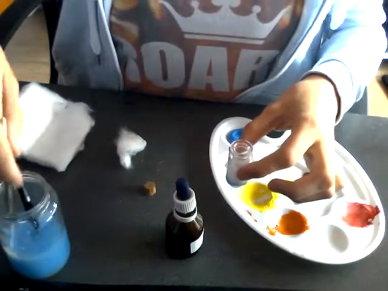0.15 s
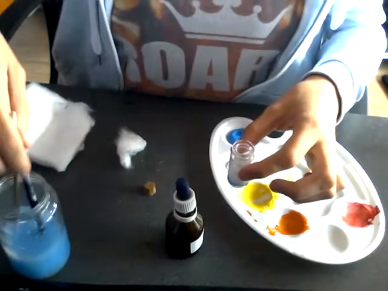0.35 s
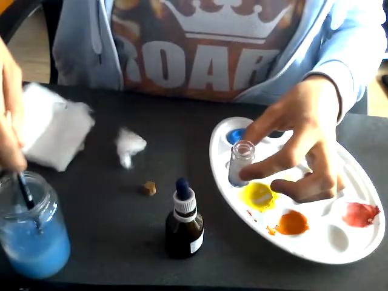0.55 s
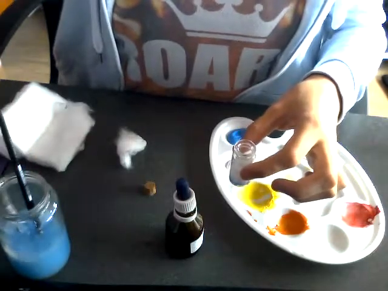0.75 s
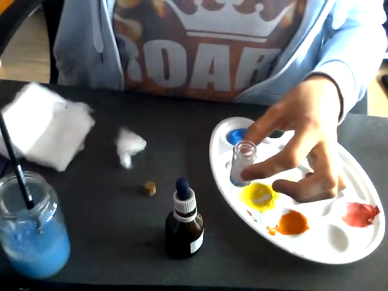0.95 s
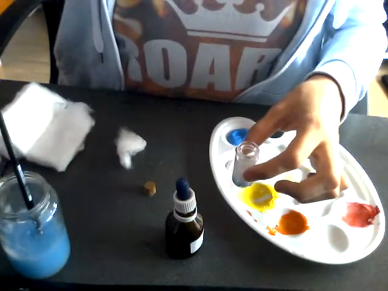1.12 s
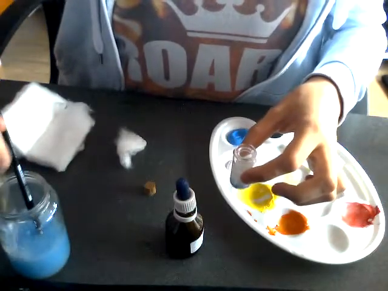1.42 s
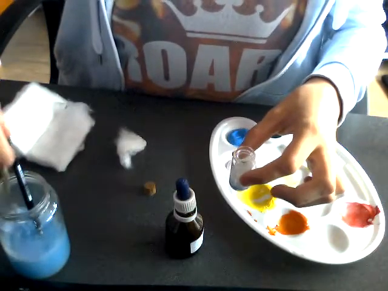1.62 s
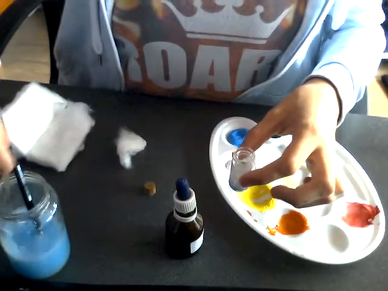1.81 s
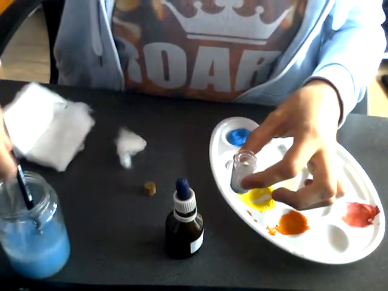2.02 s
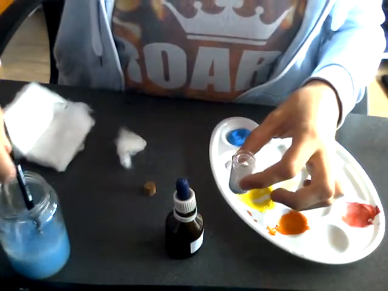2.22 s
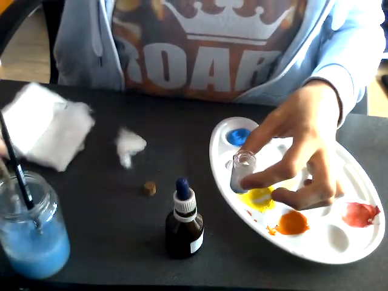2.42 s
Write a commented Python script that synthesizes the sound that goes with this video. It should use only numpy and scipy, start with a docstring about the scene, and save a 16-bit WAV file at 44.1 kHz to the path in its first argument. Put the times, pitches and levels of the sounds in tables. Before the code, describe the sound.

A brush clinks in a glass water jar, heard close in a small room. A loud bright tap at 0.23 s leads to a duller knock, tiny scrapes and plops until 0.5. Sparse taps follow at 0.86 and 0.96, faint jar rubbing around 1.2-1.5, a crisp clink at 1.53. From 1.7 water plops, drips and swirls; sharp clinks at 2.13 and 2.27. Low room noise and faint hum underneath.

```python
"""Brush stirred in a water jar

A brush handle clinks on the rim and wall of a glass jar, and drips hit: each is a noisy click plus fading sines.
The jar knocks and rubs on the table (low fading sines); the metal ferrule scrapes in runs of tiny clicks.
Water plops and fizzes as rising sines, and swirls as random pops through sliding resonances.
A small room adds noise echoes; shaped noise, hum and brief low bumps near 100 Hz lie underneath."""
import sys
import numpy as np
from scipy import signal
from scipy.fft import rfft, irfft
from scipy.io import wavfile
from scipy.ndimage import uniform_filter1d

SR = 44100
rng = np.random.default_rng(int(sys.argv[2]) if len(sys.argv) > 2 else 0)


def wav_out(sig):
    """Save sig, one row per channel (or a flat mono array), as 16-bit PCM at SR to the path in sys.argv[1]."""
    wavfile.write(sys.argv[1], SR, np.round(np.clip(np.atleast_2d(sig).T, -1, 1) * 32767).astype(np.int16))


N = 112454
T = np.arange(N) / SR
RING_T = T[:SR // 4]  # the first quarter second
FIZZ_PER_S = 900  # average births of tiny bubbles


def amp(db):
    """Turns decibels into a gain."""
    return 10 ** (np.asarray(db) / 20)


def read(points, hz):
    """Reads a curve along a log-frequency axis."""
    f, value = np.transpose(points)
    return np.interp(np.log(hz + 1), np.log(f + 1), value)


def evened(x, size=None):
    """Scales to rms 1, or to the energy of `size` samples at rms 1."""
    return x / np.sqrt(np.sum(x ** 2) / (size or len(x)) + 1e-20)


def add(mix, s, sound):
    """Mixes a sound in at a time in seconds, cutting what runs past the end."""
    part = mix[max(round(s * SR), 0):][:len(sound)]
    part += sound[:len(part)]


def clinks():
    """Each tap or drip impact is a tick with a brief chatter, and the ring of the glass."""
    # taps of the handle, and three drip impacts at 1.77, 1.81 and 2.16 s:
    # t/s, tick level/dB over 5 ms, contact cut-off f/Hz, ring level/dB over 10 ms
    taps = [(0.001, -83, 3270, -55), (0.038, -63, 3700, -49.5), (0.2277, -19, 14700, -37),
            (0.3168, -39.5, 3900, -48), (0.857, -35.5, 6270, -38.5), (0.9553, -42, 1800, -45.5),
            (1.254, -56, 2400, -57), (1.5273, -29.5, 15600, -41.5), (1.671, -43, 2560, -48.5),
            (1.7713, -52, 7300, -58), (1.8099, -53, 4180, -77), (2.1, -52, 5750, -59),
            (2.1071, -59, 4940, -56.5), (2.1266, -27, 12000, -45.5), (2.1604, -46, 1540, -65),
            (2.2715, -23.5, 13800, -40.5)]
    chatter_s, chatter_db = .0014, 10  # fade to a third; energy against the first hit
    out, t = np.zeros(N), T[:600]
    for s, tick_db, cut_hz, ring_db in taps:
        # a buzz just after contact
        buzz = rng.standard_normal(len(t)) * np.exp(-t / chatter_s)
        force = amp(chatter_db) * evened(buzz, size=1)
        force[0] += 1
        add(out, s, amp(tick_db) * evened(tick(cut_hz, force), size=220))
        add(out, s, amp(ring_db) * evened(glass(cut_hz), size=440))
    return out


def tick(cut_hz, force, size=2048):
    """The click of a contact: timing comes from the force, colour from the hardness."""
    # colour of a hard tick, before softness dulls it: f/Hz, relative level/dB
    colour = [(150, -15), (500, -25.5), (2000, -23.5), (3400, -24), (4230, -8), (5200, -19), (5800, -6.5),
              (6400, -10.5), (8200, -2.5), (8700, 3.5), (10000, -3.5), (11000, 2), (12100, -11),
              (13300, -5), (14300, -5), (14900, -7), (16800, -6)]
    hz = abs(np.fft.fftfreq(size, 1 / SR))
    push = np.fft.fft(force, size)
    wanted = amp(read(colour, hz)) * contact(hz, cut_hz)
    # divide out the force's own colour, with a floor so that its gaps are not boosted without limit
    push_level = abs(push) + .3 * abs(push).mean()
    log_gain = np.log(wanted / push_level + 1e-6)
    # this phase makes the filter react only after the force, never before
    response = np.exp(np.conj(signal.hilbert(log_gain)))
    return np.fft.ifft(push * response).real[:size // 2]


def contact(hz, cut_hz):
    """A softer contact has a lower cut-off and leaves out more treble."""
    return 1 / np.sqrt(1 + (hz / cut_hz) ** 7.53)


def glass(cut_hz):
    """Soft contacts land on the wall, hard ones on the rim; the ring reaches higher than the tick."""
    # tones of the jar: base f/Hz, relative level/dB on the wall, on the rim, time to fade 60 dB/s
    jar_modes = [(3760, -12, -13, .06), (4195, -2, -16, .1), (4130, -3, 0, .035), (5940, -8, 2, .08),
                 (6950, -3, -10, .06), (7340, -2, -14, .07), (8600, -10, -4, .035), (9539, -19, 2, .07),
                 (10450, -17, -9, .06), (10970, -15, -8, .07), (11220, -1, -4, .08), (13400, -7, -9, .05)]
    wall_cut_hz, rim_cut_hz = 2500, 12000  # this soft is all wall, this hard is all rim
    ring_reach = 1.5  # the ring's cut-off as a multiple of the tick's
    waver_db, waver_s = 2.5, .008  # unevenness of the ring: rms size, smoothing time
    detune = .002  # random change of each tone from tap to tap, as a fraction of pitch
    rim = np.clip((cut_hz - wall_cut_hz) / (rim_cut_hz - wall_cut_hz), 0, 1)
    hz, wall_db, rim_db, t60 = np.transpose(jar_modes)
    db = (1 - rim) * wall_db + rim * rim_db
    db = db + 20 * np.log10(contact(hz, ring_reach * cut_hz))
    waver = evened(uniform_filter1d(rng.standard_normal(len(RING_T)), round(waver_s * SR)))
    shifted_hz = hz * (1 + detune * rng.standard_normal(len(hz)))
    return amp(waver_db * waver) * ring(zip(shifted_hz, db, t60))


def ring(modes):
    """After a hit, a solid sounds several tones that each die away at their own rate."""
    out = np.zeros(len(RING_T))
    for hz, db, t60 in modes:
        fade = np.exp(-np.log(1000) * RING_T / t60)  # down 60 dB after t60
        out += amp(db) * fade * np.sin(2 * np.pi * hz * RING_T)
    return out


def scrapes():
    """The ferrule slides on the wall in quick runs of tiny slips, each a tick and a ring."""
    # slides: t/s, length/s, level/dB averaged over the length
    slides = [(0.203, 0.015, -46), (0.369, 0.014, -44.5)]
    slips_per_s, cut_hz, ring_db = 3500, 4270, -6  # average rate; contact cut-off; ring against tick
    out = np.zeros(N)
    slip = evened(glass(cut_hz), size=1) * amp(ring_db)
    add(slip, 0, evened(tick(cut_hz, [1]), size=1))
    for s, length, db in slides:
        n = min(round(length * SR), 2048)
        slips = rng.random(n) < slips_per_s / SR
        strength = rng.random(n) - .5
        force = slips * strength * np.sqrt(np.hanning(n))  # swells and fades over the slide
        add(out, s, amp(db) * evened(signal.fftconvolve(force, slip), size=n))
    return out


def thumps():
    """The jar pushes and rubs on the table, setting off dull tones of jar and table."""
    # knocks on the table: t/s, level/dB over 10 ms
    knocks = [(0.321, -33.5), (0.856, -44.5), (0.955, -36.5), (1.269, -43), (1.674, -34.5), (1.866, -45.5),
              (2.158, -52)]
    # jar shifting on the table: t/s, length/s, level/dB averaged over the length
    rubs = [(0, 0.015, -48), (1.203, 0.075, -55), (1.349, 0.14, -54.5)]
    # tones of jar and table: f/Hz, relative level/dB, time to fade 60 dB/s
    table_modes = [(278, -8, .045), (392, 0, .04), (440, -2, .03), (620, -5, .022)]
    rise_s = 0.0047  # softens the start
    out = np.zeros(N)
    knock = evened(ring(table_modes) * (1 - np.exp(-RING_T / rise_s)), size=440)
    for s, db in knocks:
        add(out, s, amp(db) * knock)
    for s, length, db in rubs:
        n = min(round(length * SR), len(RING_T))
        friction = rng.standard_normal(n) * np.sqrt(np.hanning(n))
        add(out, s, amp(db) * evened(signal.fftconvolve(friction, knock), size=n))
    return out


def water(count=24):
    """Plops and a light tap, over a fizz of small bubbles that follows the stirring."""
    # strength of the stirring: t/s, fizz level/dB (rms)
    stirring = [(0, -67), (.17, -64.5), (.3, -63), (.45, -61.5), (.6, -69), (1.6, -70.5), (1.72, -63.5),
                (1.9, -65.5), (2.02, -60.5), (2.08, -69.5), (2.28, -68), (2.54, -70)]
    # single bubbles; the pair at 1.37 s is a light tap, a dull body and a high blip:
    # t/s, starting f/Hz, peak level/dB of the tone, fade to a third/cycles
    plops = [(0.038, 1283, -43, 4.4), (0.21, 1680, -45, 12), (0.2876, 1153, -39.5, 5.2),
             (0.317, 927, -37.5, 6.5), (0.379, 1024, -31.5, 4), (0.3803, 2330, -47, 6.5),
             (0.4464, 930, -37, 3.3), (0.4471, 1302, -36.5, 4.2), (0.4597, 3890, -43, 18),
             (1.369, 1810, -36, 1.5), (1.37, 6860, -47, 34), (1.718, 1120, -38.5, 4.7),
             (1.7717, 934, -28, 7.2), (1.864, 1840, -44.5, 4.4), (1.8169, 966, -38, 4.9),
             (1.8664, 1135, -33.5, 3), (1.9583, 8560, -37, 17), (1.997, 2060, -52, 8.4),
             (1.967, 8700, -39, 17), (2.0976, 3020, -40, 2), (2.1607, 936, -36, 2.4),
             (2.2434, 990, -37.5, 6.3), (2.245, 6980, -35.5, 16), (2.285, 1144, -45.5, 7),
             (2.367, 1640, -50.5, 3.6)]
    low_hz, high_hz, tilt_db = 1201, 8130, 0.5  # range of fizz pitches; level change per octave
    fizz = np.zeros(N)
    for hz in np.geomspace(low_hz, high_hz, count):
        births = rng.random(N) < FIZZ_PER_S / count / SR
        strength = amp(3.6 * np.minimum(rng.exponential(1, N), 3))
        pitch_gain = amp(tilt_db * np.log2(hz / low_hz))
        fizz += pitch_gain * signal.oaconvolve(births * strength, bubble(hz, cycles=11.6))[:N]
    out = evened(fizz) * amp(np.interp(T, *np.transpose(stirring)))
    for s, hz, db, cycles in plops:
        add(out, s, amp(db) * bubble(hz, cycles))
    return out


def bubble(hz, cycles, size=3000):
    """An air pocket rings and rises a little in pitch, with some wet spatter around it."""
    glide_per_s = 0.5  # pitch rise, as a fraction of the starting pitch
    splash_db, splash_octaves = -17, 0.69  # spatter level; distance from the pitch where it drops to a third
    t, f = T[:size], np.fft.rfftfreq(size, 1 / SR)
    turns = hz * t * (1 + glide_per_s * t / 2)  # cycles so far
    near_pitch = np.exp(-(np.log2((f + 1) / hz) / splash_octaves) ** 2)
    spatter = evened(irfft(rfft(rng.standard_normal(size)) * near_pitch, size))
    return swell(turns, cycles) * (np.sin(2 * np.pi * turns) + amp(splash_db) * spatter)


def swell(turns, cycles):
    """A bubble's loudness rises over about a cycle, then fades; its peak is 1."""
    rise_cycles = 1.0
    shape = (1 - np.exp(-(turns / rise_cycles) ** 2)) * np.exp(-turns / cycles)
    return shape / shape.max()


def swirl():
    """Tiny bubbles ring the hollow behind the brush, whose pitch mostly rises as it closes."""
    # water swirling round the brush: t/s, lower resonance f/Hz, level/dB of that resonance
    hollow = [(1.79, 980, -67), (1.85, 1210, -59), (1.92, 1150, -65.5), (1.971, 1287, -58),
              (2.03, 1706, -68), (2.07, 1810, -80)]
    width_hz, upper = 173, 1.672  # width of each filter pole; upper resonance over the lower
    s, hz, db = np.transpose(hollow)
    out, r = np.zeros(N), np.exp(-np.pi * width_hz / SR)
    for multiple in (1, upper):
        turn = np.exp(2j * np.pi * np.cumsum(multiple * np.interp(T, s, hz)) / SR)
        pops = (rng.random(N) < FIZZ_PER_S / SR) * rng.standard_normal(N)
        # shift the moving pitch down to zero, filter there, and shift back up
        smoothed = signal.lfilter([1], np.poly([r, r]), pops / turn)
        out += evened((turn * smoothed).real) / multiple
    return out * amp(np.interp(T, s, db)) * (T > s[0]) * (T < s[-1])


def room(x):
    """Close reflections from the table top, then a short tail whose pitches die at different rates."""
    # tail of the room: f/Hz, time to fade 60 dB/s
    tail_fade = [(200, 0.75), (2000, 0.34), (9000, 0.14), (15000, 0.21)]
    early_db, early_s, tail_db = -9, .0045, -15  # energy against the direct sound; early fade to a third
    early, late = rng.standard_normal((2, len(RING_T)))
    early = evened(early * (RING_T > .001) * np.exp(-RING_T / early_s), size=1)
    hz, t, z = signal.stft(late * (RING_T > .005), SR, nperseg=256)
    fade = np.exp(-np.log(1000) * t / read(tail_fade, hz)[:, None])
    tail = signal.istft(z * fade, SR, nperseg=256)[1][:len(RING_T)]
    echoes = amp(early_db) * early + amp(tail_db) * evened(tail, size=1)
    return x + signal.fftconvolve(x, echoes)[:N]


def background():
    """Room noise is shaped random noise, mains hum steady sines, table sway brief low bumps near 100 Hz."""
    # colour of the room noise: f/Hz, relative level/dB per Hz
    floor_colour = [(12, -40), (20, -6), (98, -3), (127, -8.5), (172, -12), (499, -19.5), (718, -25.5),
                    (780, -23.5), (1090, -29), (1530, -37), (2080, -35.5), (2670, -37), (14300, -39.5),
                    (16000, -43)]
    # mains hum: f/Hz, rms level/dB
    hum = [(50, -53.5), (100, -78)]
    # table swaying under the arm, heard as brief low bumps: t/s, length/s, f/Hz, peak level/dB
    sways = [(0.61, 0.094, 98, -41), (1.561, 0.059, 100.6, -42), (2.479, 0.081, 99.6, -39.5)]
    floor_db = -49.5  # rms
    colour = amp(read(floor_colour, np.fft.rfftfreq(N, 1 / SR)))
    noise = irfft(rfft(rng.standard_normal(N)) * colour, N)
    out = amp(floor_db) * evened(noise)
    for hz, db in hum:
        out += amp(db) * evened(np.sin(2 * np.pi * (hz * T + rng.random())))
    for s, length, hz, db in sways:
        t = T[:round(length * SR)]
        add(out, s, amp(db) * np.sin(np.pi * t / length) * np.sin(2 * np.pi * hz * t))
    return out


def scene():
    """Brush, jar and water sound in the room, over the background."""
    wet = room(clinks() + scrapes() + thumps() + water() + swirl())
    return (wet + background())[None]


def record(dry):
    """The recorder's band limit: a steep filter removes the highest treble."""
    edge_hz = 16100
    low_pass = signal.firwin(255, edge_hz, window=("kaiser", 9), fs=SR)
    return signal.oaconvolve(dry, low_pass[None], "same")


dry = scene()
out = record(dry)
wav_out(out)
```